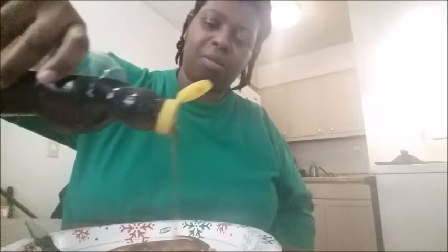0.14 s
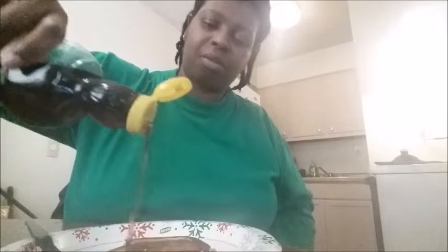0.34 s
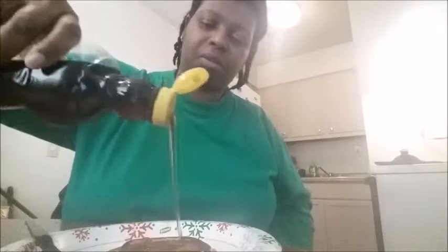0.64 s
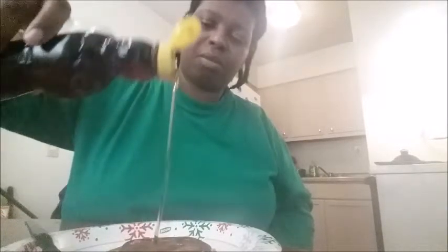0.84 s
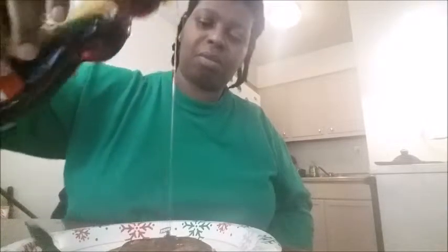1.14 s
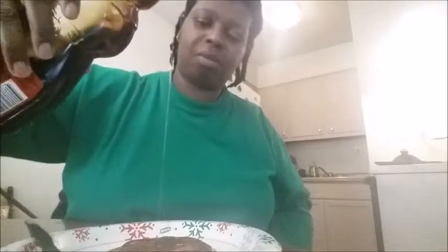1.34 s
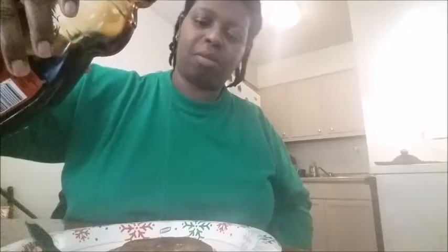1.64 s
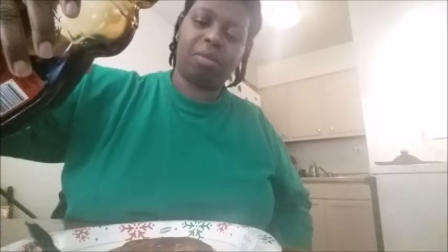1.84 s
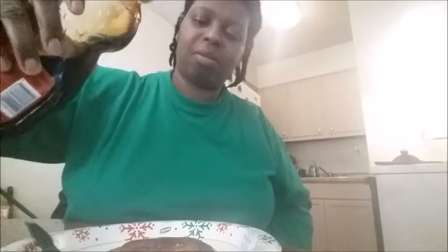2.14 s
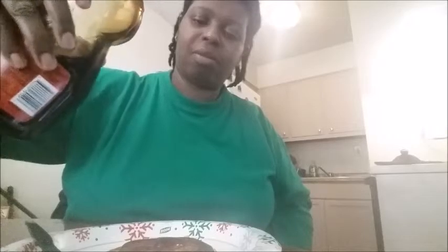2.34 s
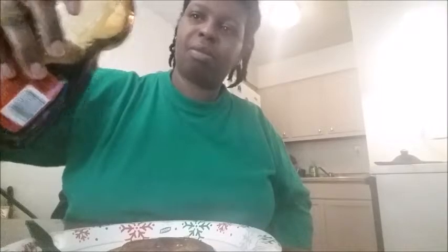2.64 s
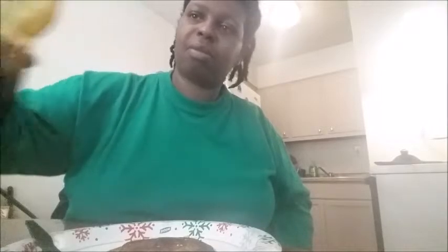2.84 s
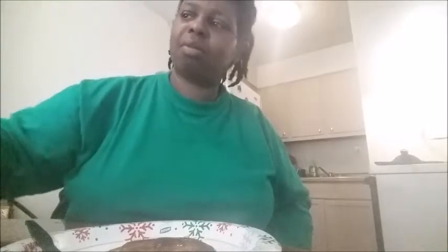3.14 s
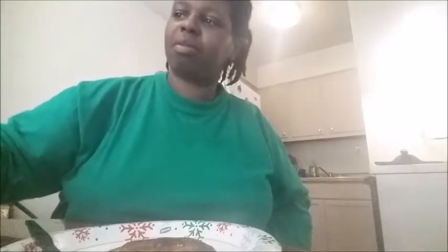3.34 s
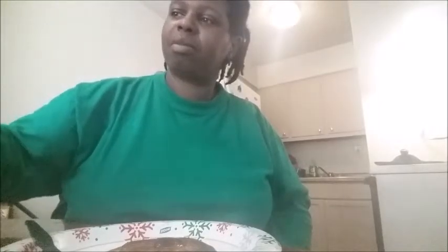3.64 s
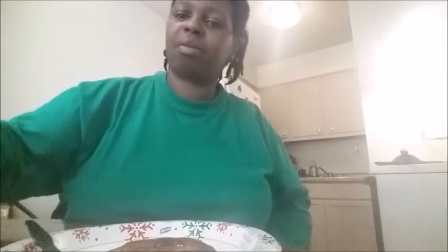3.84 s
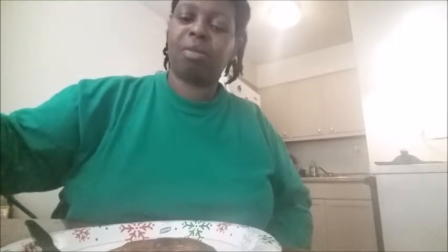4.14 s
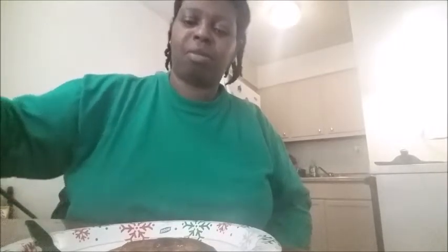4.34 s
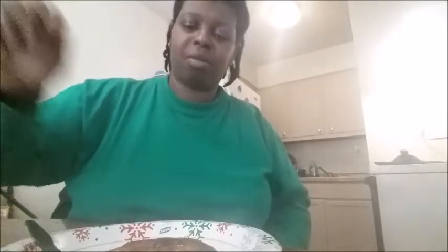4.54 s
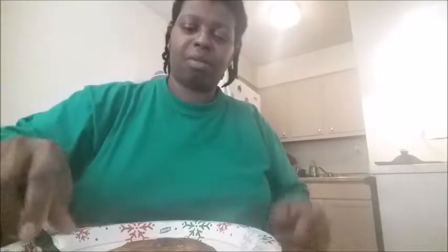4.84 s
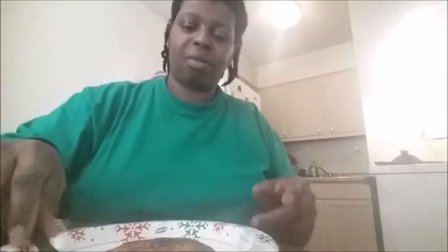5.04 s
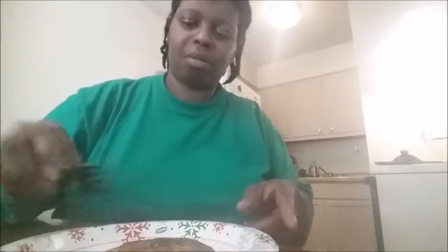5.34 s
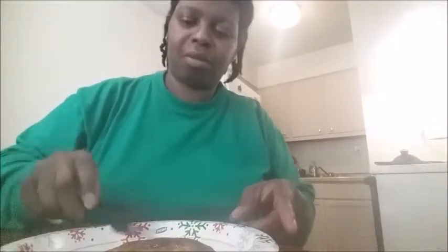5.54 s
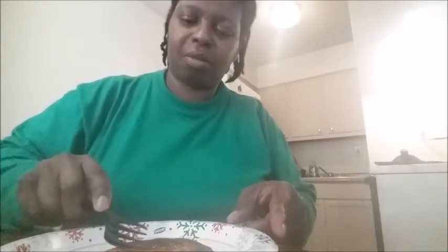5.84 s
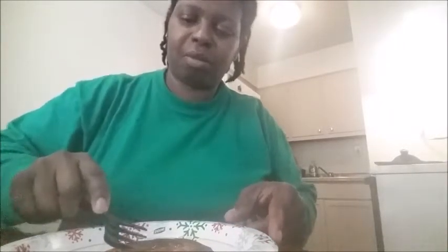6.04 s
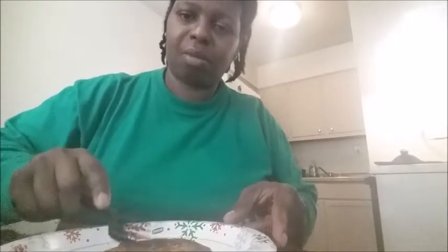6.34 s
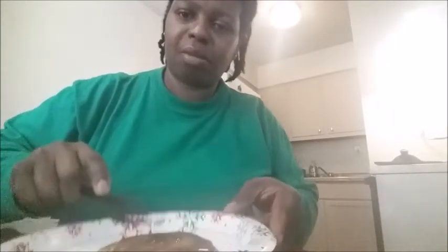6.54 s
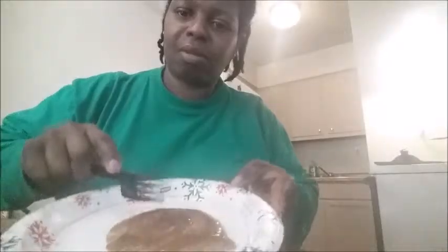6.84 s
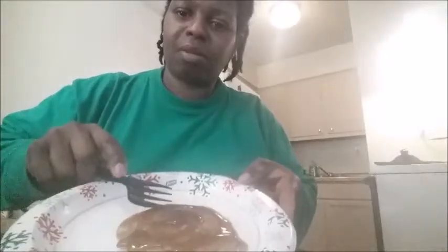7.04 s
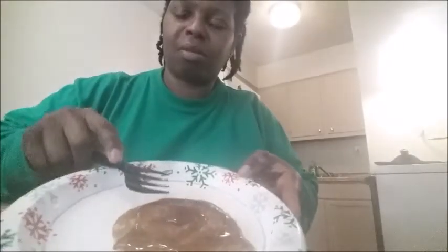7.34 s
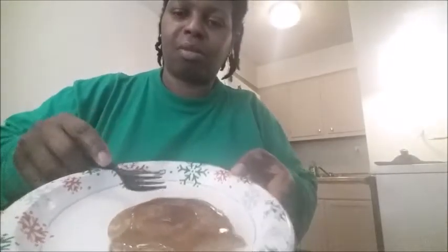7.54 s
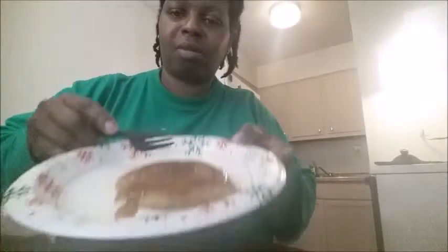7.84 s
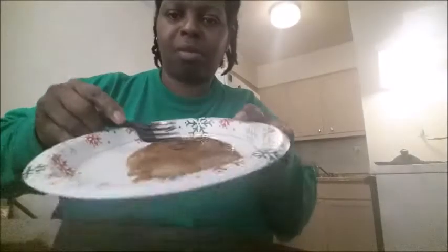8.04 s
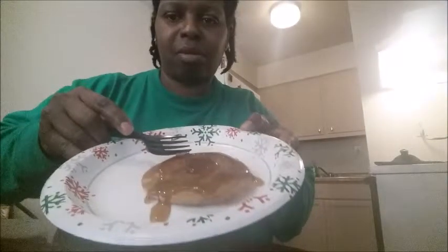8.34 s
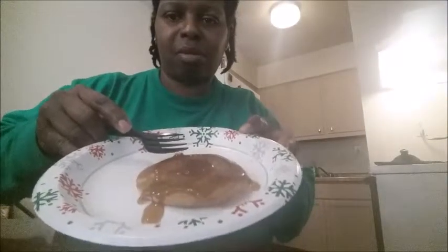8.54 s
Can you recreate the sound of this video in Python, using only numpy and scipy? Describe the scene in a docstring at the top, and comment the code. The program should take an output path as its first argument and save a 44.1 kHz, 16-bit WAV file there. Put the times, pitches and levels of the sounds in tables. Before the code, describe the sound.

A quiet small kitchen with a low, steady refrigerator hum. Faint plastic handling at first, then firmer rubs and clicks as a bottle is moved and set down with dull table thuds. A fork is picked up with one bright, hard knock, then a paper plate pops in a quick flutter and is rubbed and lifted with dry ticks. Close stereo phone microphone on the table, slight room echo.

```python
"""Bottle, fork and paper plate in a quiet kitchen

A plastic bottle is handled and set down, a fork is picked up and knocks, a paper plate is flexed and rubbed.
Ticks and rubbing are shaped noise; fork, plate and table ring as sums of fading sine waves.
A refrigerator hums behind them in slightly unsteady sine tones, over the soft noise of the room.
All is heard through the two microphone ports, left and right, of a phone that stands on the table."""
import sys
import numpy as np
from scipy import signal
from scipy.fft import rfft, irfft, next_fast_len
from scipy.io import wavfile
from scipy.ndimage import uniform_filter1d, map_coordinates

SR = 44100
rng = np.random.default_rng(int(sys.argv[2]) if len(sys.argv) > 2 else 0)


def waveform_to_disk(signal):
    """Save audio, clipped to [-1, 1], as 16-bit WAV at the path in sys.argv[1]."""
    frames = np.transpose(np.atleast_2d(signal))
    scaled = np.clip(frames, -1, 1) * 32767
    samples = np.round(scaled).astype(np.int16)
    wavfile.write(sys.argv[1], SR, samples)


N = 383229  # length in samples

# strokes of hands on plastic and paper: full_level_s (when the rise ends), rise_s, hold_s, fall_s, level_db,
# body_db and fizz_db (lows and highs against the middle), grip_hz and grip_db (ring of the gripped part)
HAND_STROKES = [ (0.27, 0.022, 0.022, 0.12, -71, 11, -12, 1240, 18.5),
                (0.362, 0.045, 0.038, 0.14, -68.5, 8.5, -10, 1240, 16),
                (0.884, .04, .01, .2, -89.5, 18, 10.5, 1200, 5),
                (1.093, .1, 0.14, 0.37, -95.5, 8, 11, 997, -2),
                (1.449, .02, .02, 0.14, -78, 23, -16, 780, 1),
                (2.228, .1, 0.079, 0.34, -76.5, 9, -8.5, 1700, 6.5),
                (2.43, 0.011, .015, .16, -59, 3, 1.5, 2000, 7),
                (2.529, 0.02, .012, 0.2, -51.5, -2, -4, 1310, 8),
                (2.639, .15, 0.083, 0.11, -59, 3, -8, 1650, 6),
                (2.79, .05, 0.061, 0.93, -70, 5, -8.5, 1590, 1.5),
                (2.996, 0.058, 0.045, .15, -63.5, 10, -1.5, 1274, 12),
                (3.129, .02, 0.023, 0.18, -63, 9.5, -5.5, 1840, 8),
                (3.4, 0.0093, .03, 0.13, -65.5, 19, -6, 1800, 0.5),
                (3.467, 0.12, .12, 0.1, -60.5, 9.5, -7.5, 1790, 1.5),
                (3.613, .03, 0.08, .9, -72, 11.5, -8.5, 2000, -1),
                (4.048, 0.011, 0.009, 0.12, -68, 12, 1, 4930, 11),
                (4.12, 0.049, .01, 0.042, -67, 14, -13, 4970, 8),
                (4.203, 0.14, 0.14, .4, -71.5, 11, -5, 4020, 7.5),
                (4.48, 0.073, .015, 0.24, -69, 13, -8.5, 2000, 3.5),
                (4.65, 0.12, .1, 0.46, -80.5, 13, -2, 2200, 2),
                (5.008, 0.012, .03, .1, -75, 13, -10, 2490, 2.5),
                (5.085, .1, 0.025, .12, -63.5, 7, -3, 2600, 4.5),
                (5.18, 0.026, .004, 0.022, -60, 13, -10, 2740, 1),
                (5.218, 0.022, .003, .009, -57.5, -2, 11, 2750, 6),
                (5.259, .03, 0.013, 0.049, -49.5, -2, 5, 2700, 2),
                (5.334, .03, .03, .15, -65.5, -5, -4, 2660, 0.5),
                (5.45, .1, .03, .4, -78, 9, 4.5, 2400, 0.5),
                (5.767, 0.022, .005, .06, -74, 3, -4, 2110, 4.5),
                (5.833, 0.13, 0.036, 0.26, -83, 20, 6, 2150, 1.5),
                (6.089, .03, .005, .1, -72, -6, 1.5, 2200, 12),
                (6.14, .05, .05, 0.58, -85, 5, 7.5, 2250, 5.5),
                (6.435, 0.095, 0.035, 0.27, -71, 18, 2.5, 2380, 0.5),
                (6.704, 0.1, 0.053, .1, -65, 5, -2, 2490, 5.5),
                (6.802, 0.093, .035, 0.14, -64, 11, -1, 2520, 6),
                (6.893, 0.06, 0.067, 0.37, -68.5, 9, -7, 2580, 2.5),
                (7.015, 0.02, .04, .1, -61, 3, 3.5, 2560, 3), (7.094, .1, 0.01, .045, -54, 4, -6, 2610, 4),
                (7.178, .05, .03, .2, -70, 13, -1.5, 2600, 2.5),
                (7.279, .1, 0.084, 0.09, -57, 6.5, -6, 2710, 3.5),
                (7.424, .01, .05, 0.11, -68, 11.5, 1, 2710, 4),
                (7.535, 0.044, 0.055, 0.25, -72.5, 13.5, -4.5, 2710, 6),
                (7.674, .06, .025, .05, -57, 0, -6, 2720, 7.5),
                (7.762, .14, .03, 0.05, -55.5, 3, -1, 5770, 7.5),
                (7.854, .05, .02, 0.12, -72, 9.5, 6, 2470, 4),
                (7.982, 0.064, .01, .15, -70.5, 12, -1.5, 2550, 2),
                (8.047, .1, .1, .9, -76.5, 12, -6, 2550, -3)]
SWELL_DB = 20  # change of level within one rise or fall time


def ticks():
    """A sharp snap, a short ring and a few milliseconds of rattle; the treble dies first."""
    # dry ticks: start_s, level_db, body_db and fizz_db (lows and highs against the middle),
    # left_right_db, ring_hz, ring_db (against the middle)
    dry_ticks = [(.2673, -63.5, 15, -16, -5, 1160, 10), (.3581, -68, 8, 3, -7, 1310, 7),
                 (1.4458, -78, 23, -10, -5, 753, 33), (2.433, -56.5, 16, 15.5, -8, 920, 6),
                 (2.5194, -52, 5, -6, -4, 1300, 4), (2.527, -48.5, 9, 9, -8.5, 780, 13),
                 (2.6218, -52, 9, -10.5, -3, 770, 3), (2.9868, -58, 7, -6, -7, 1230, 0),
                 (3.1332, -53, 7, -4.5, -8, 760, 6), (3.3983, -51.5, 8, -2.5, -2, 700, 6),
                 (3.456, -54.5, 5, -4, -9, 1260, -3), (3.5245, -60, 10, -4, -6, 785, 6),
                 (3.5748, -59.5, 17, -10, -10, 700, 6), (4.0259, -43, 8.5, 0.5, -13, 2580, -6),
                 (4.0339, -57, 4, 3, -4, 4840, 6), (4.4769, -65.5, 16.5, 4, -4, 700, 9),
                 (5.0095, -54, 4, -8, -11, 2400, 0), (5.0502, -57, 5, -1, -13, 770, 0),
                 (5.1888, -57, -10, 2, -6, 2700, -6), (5.2408, -36, 3, -2.5, -15, 2620, -4),
                 (5.4782, -71, 6, 12.5, -6, 720, 0), (5.7662, -68.5, 4, 2, -7, 2140, 4),
                 (6.0923, -62, -2, 3, -12, 2360, 9), (6.2277, -74, 6, 8, -3, 960, 2),
                 (6.6997, -57.5, 8, -13, -4, 2400, -8), (6.7502, -52.5, -18, -2, -16, 2300, 8.5),
                 (7.0118, -52.5, -2, 0, -17, 2500, -6), (7.1114, -52.5, 0, -10, -5, 840, 12),
                 (7.2873, -46, -1, -9, 3, 2530, -3), (7.4152, -36, 0, -4, -8, 1370, 1.5),
                 (7.6557, -53.5, 1, -8, -2, 2470, -2), (7.7641, -44.5, -.5, -4, -6, 2200, -3),
                 (7.9766, -66, 0, 2, -10, 2500, 2)]
    snap_t60_s, ring_t60_s = 0.012, 0.024  # time to fall by 60 dB, for the middle and for the ring
    out = np.zeros((2, N + SR))
    t = np.arange(2048) / SR
    shared, left, right = rng.standard_normal((3, N))
    noise = shared + 1.4 * np.array([left, right])
    # a small contact radiates little bass
    parts = registers(filtered(noise, lambda hz: hz ** 2 / (hz ** 2 + 1000. ** 2)))
    onset = 1 - np.exp(-t / .0001)
    for k, (start_s, level_db, body_db, fizz_db, pan_db, ring_hz, ring_db) in enumerate(dry_ticks):
        # each tick takes its own piece of the noise
        body, middle, fizz = (part[:, k * len(t):][:, :len(t)] for part in parts)
        fall_db = -60 * t / snap_t60_s
        snap = middle * amp(fall_db)
        snap = snap + amp(body_db + 0.72 * fall_db) * body
        snap = snap + amp(fizz_db + 1.04 * fall_db) * fizz
        ring = amp(ring_db - 60 * t / ring_t60_s) * np.sin(2 * np.pi * ring_hz * t)
        tick = amp(level_db) * sides(pan_db)[:, None] * (snap + ring) * onset
        out[:, round(start_s * SR):][:, :len(t)] += tick
    return out[:, :N]


def fork():
    """Short hard knocks of the handle against the table make the fork ring."""
    # knocks: start_s, strength_db, left_right_db
    knocks = [(5.1875, -48, -2), (5.2407, -29, -4), (5.2464, -43, -2)]
    # ringing tones of the fork: pitch_hz, level_db, t60_s (time to fall by 60 dB)
    fork_modes = [(755, -10.5, 0.2), (837, -1, 0.059), (1066, 1, 0.024), (1146, 0, 0.086),
                  (1224, -4.5, 0.068), (1350, -0.5, 0.021), (1700, -2, 0.014), (1897, -4, 0.031),
                  (2000, -7.5, 0.025), (2200, -0.5, 0.038), (2520, -10, 0.041), (2574, -3, 0.062),
                  (2710, -5.5, 0.1), (2720, -20.5, 0.054)]
    # the high ring reaches the right port best: pitch_hz, left_right_db
    fork_lean = [(700, 0), (1500, -3), (2500, -4.5)]
    ringing = -struck(fork_modes, knocks, attack=.0001, spread_db=1.0)
    return filtered(ringing, lambda hz: sides(along(fork_lean, hz)))


def plate():
    """The paper buckles in quick runs of pops, each a bundle of briefly ringing tones."""
    # pops: start_s, strength_db
    pops = [(6.398, -40), (6.41, -34.5), (6.416, -39.5), (6.4201, -33), (6.4254, -35.5), (6.4346, -35.5),
            (6.4394, -37.5), (7.4156, -44), (7.766, -47.5), (7.7732, -41), (7.784, -47)]
    # ringing tones of the plate: pitch_hz, level_db, t60_s (time to fall by 60 dB)
    plate_modes = [(150, 0.5, 0.079), (202, 3, 0.072), (231.4, 5, 0.045), (392, 0.5, 0.068),
                   (460, 2, 0.043), (510, -14, 0.061), (780, -25, 0.021), (1050, -39, 0.026)]
    blows = [(start_s, strength_db, -1.5) for start_s, strength_db in pops]
    return -struck(plate_modes, blows, attack=.001, spread_db=2)


def table():
    """A softer blow is a longer push that wakes the upper tones less; the lowest tone sways the whole table."""
    # blows on the table top: start_s, strength_db, hardness_hz, sway_db (of the whole table), left_right_db
    thuds = [(3.399, -22, 290, 0, -6), (3.428, -26.5, 150, -3.5, -8.5), (3.575, -27.5, 300, -4.5, -5),
             (3.588, -21.5, 199, 3, -7), (3.6, -29, 200, 2.5, -2), (3.807, -41, 150, 6.5, -11),
             (3.856, -33.5, 202, -6, -6.5), (4.038, -38, 403, -10, -6), (4.117, -31, 250, -17, -5),
             (4.131, -41, 201, -12, -16), (4.475, -37, 300, -16, -7)]
    # ringing tones of the table: pitch_hz, level_db, t60_s (time to fall by 60 dB)
    table_modes = [(60.3, -1.5, 0.3), (97.3, -2.5, 0.19), (122.3, 0, 0.16), (154.7, -2.5, 0.13),
                   (246, -1.5, 0.072), (318.7, -11.5, 0.18), (411, -4, 0.08), (497, -12, 0.064),
                   (700, -27, 0.051)]
    out = 0
    for start_s, strength_db, hard_hz, sway_db, pan_db in thuds:
        felt = []
        for k, (hz, level_db, t60_s) in enumerate(table_modes):
            softness_db = 10 * np.log10(1 + (hz / hard_hz) ** 4)
            felt.append((hz, level_db - softness_db + sway_db * (k == 0), t60_s))
        out = out + struck(felt, [(start_s, strength_db, pan_db)], attack=0.00062, spread_db=2.5)
    return out


def rubbing():
    """Skin and plastic slip in dense tiny jerks; the loudest stroke sets the resonance of the gripped part."""
    # balance of the rubbing: pitch_hz, left_right_db
    rub_lean = [(60, -2), (180, -2), (540, -3.5), (1640, -2), (4930, -12.5), (14800, 6)]
    body_db, fizz_db, grip_hz, grip_db = np.transpose(HAND_STROKES)[5:]
    hz, t = signal.stft(np.zeros(N), SR, nperseg=256)[:2]
    loudest = strokes(t).argmax(0)
    distance = np.log((hz[:, None] + 1) / grip_hz[loudest])
    ring_db = grip_db[loudest] * np.exp(-(distance / 0.15) ** 2)
    shared, left, right = patched(count=3, size=256, depth_db=2.5, bins=3, frames=9, boost_db=ring_db)
    jerks = amp(1.34 * wobble(400) + 1.32 * wobble(40))
    # the two ports hear different parts of the surface
    pair = (shared + 2.3 * np.array([left, right])) * jerks
    parts = registers(filtered(pair, lambda hz: sides(along(rub_lean, hz))))
    steps = np.arange(0, N / SR, .001)
    power = strokes(steps)
    out = 0
    for part, part_db in zip(parts, (body_db, 0 * body_db, fizz_db)):
        gain = np.sqrt(amp(2 * part_db) @ power)
        out = out + np.interp(np.arange(N) / SR, steps, gain) * part
    return out


def strokes(t):
    """Power of each stroke at times t: it rises, holds and falls."""
    full_s, rise_s, hold_s, fall_s, level_db = np.transpose(HAND_STROKES)[:5, :, None]
    before = np.maximum((full_s - t) / rise_s, 0)
    after = np.maximum((t - full_s - hold_s) / fall_s, 0)
    return amp(2 * np.maximum(level_db - SWELL_DB * (before + after), -200))


def kitchen(x):
    """The room answers with fading noise; each frequency dies at its own speed."""
    # fading of the room: pitch_hz, t60_s (time to fall by 60 dB)
    room_fade = [(300, 0.23), (2000, 0.23), (10000, 0.19)]
    hz, t, z = signal.stft(rng.standard_normal((2, SR // 2)), SR, nperseg=256)
    fade = amp(-60 * t / along(room_fade, hz)[:, None])
    tail = signal.istft(z * fade, SR, nperseg=256)[1]
    delayed = np.pad(x, ((0, 0), (200, 0)))  # samples
    return signal.fftconvolve(delayed, tail / np.linalg.norm(tail[0]), axes=1)[:, :N]


def fridge():
    """Slightly unsteady motor tones over the patchy noise of the room."""
    # refrigerator tones: pitch_hz, level_db, left_right_db, left_lead_rad (how far the left port is ahead)
    hum_tones = [(68.3, -62, -2.5, -0.021), (119.55, -54, 0, -0.65), (200.2, -47.5, -7, 0.21),
                 (293.6, -59.5, 1, -0.51), (354.4, -64, 0.5, 0.075), (399.6, -65.5, -4, -0.32),
                 (414.9, -63, -8.5, 0.0068), (2810, -95.5, -3, 0), (3070, -100, -3.5, 0),
                 (3220, -99, -3.5, 0)]
    # colour of room air and microphone hiss: pitch_hz, level_db (per Hz)
    air_colour = [(15, -25), (40, -3), (58, -19.5), (70, -7), (105, -10), (160, -8.5), (240, -11.5),
                  (450, -19.5), (1190, -30.5), (1930, -44), (4000, -54), (7000, -57.5), (10000, -69.5),
                  (14600, -49.5)]
    # how alike the air is at left and right: pitch_hz, likeness (1 = the same, 0 = unrelated)
    air_alike = [(60, 0.92), (180, 1), (540, 0.32), (1640, 0), (4930, 0.0), (14800, -0.0)]
    # balance of the air: pitch_hz, left_right_db
    air_lean = [(60, -3), (150, -5), (380, -4.5), (940, -4.0), (2370, -0.5), (5930, -7), (14800, 2.5)]
    air_db = -49  # level of the air as it reaches the microphone
    t = np.arange(N) / SR
    tones = 0
    for hz, level_db, pan_db, lead_rad in hum_tones:
        phase = 2 * np.pi * (hz * t + rng.random()) + 0.18 * wobble(2.8)
        tone = np.sin(phase + np.array([[lead_rad / 2], [-lead_rad / 2]]))
        swell = np.sqrt(2) * amp(level_db + 0.65 * wobble(2.037))
        tones = tones + swell * sides(pan_db)[:, None] * tone
    pair = patched(count=2, size=512, depth_db=1.5, bins=6, frames=14)
    # mixing a common and an opposite noise by this angle sets the likeness
    turn = lambda hz: np.arccos(np.clip(along(air_alike, hz), -1, 1)) / 2
    mid, side = filtered(pair, lambda hz: amp(along(air_colour, hz)) * [np.cos(turn(hz)), np.sin(turn(hz))])
    air = filtered(np.array([mid + side, mid - side]), lambda hz: sides(along(air_lean, hz)))
    return tones + amp(air_db) * unit(air)


def struck(modes, blows, attack, spread_db):
    """Every blow (start_s, strength_db, left_right_db) rings the modes, fading sines, at new strengths."""
    out = np.zeros((2, N + SR))
    t = np.arange(SR // 2) / SR
    for start_s, strength_db, pan_db in blows:
        ring = 0
        for hz, level_db, t60_s in modes:
            fall = amp(level_db + rng.normal(0, spread_db) - 60 * t / t60_s)
            ring = ring + fall * np.sin(2 * np.pi * hz * t)
        blow = sides(pan_db)[:, None] * amp(strength_db) * ring * (1 - np.exp(-t / attack))
        out[:, round(start_s * SR):][:, :len(t)] -= blow
    return out[:, :N]


def registers(x):
    """x in the colour of the surfaces, split into body, middle and fizz, each of rms 1."""
    # colour of the surfaces: pitch_hz, level_db (per Hz)
    surface = [(260, -34), (450, 1), (650, -7), (750, -3), (970, -9), (1700, -12), (2500, -9.5),
               (4000, -19), (8000, -20.5), (14600, -36)]
    below = lambda hz, edge: 1 / (1 + (hz / edge) ** 8)
    body = lambda hz: below(hz, 1500)
    middle = lambda hz: below(hz, 4000) - below(hz, 1500)
    fizz = lambda hz: 1 - below(hz, 4000)
    colour = lambda hz: amp(along(surface, hz))
    return [unit(filtered(x, lambda hz: colour(hz) * share(hz))) for share in (body, middle, fizz)]


def patched(count, size, depth_db, bins, frames, boost_db=0):
    """Noise rows whose gain varies in patches of frequency and time."""
    z = signal.stft(rng.standard_normal((count, N)), nperseg=size)[2]
    field = uniform_filter1d(rng.standard_normal(z.shape[1:]), bins, 0)
    field = uniform_filter1d(field, frames, 1)
    return signal.istft(z * amp(depth_db * unit(field) + boost_db), nperseg=size)[1][:, :N]


def late(x, count):
    """The left port lies further from the hands and hears them count samples later."""
    return np.array([np.pad(x[0], (count, 0))[:N], x[1]])


def sides(pan_db):
    """Left and right gains around the middle; a positive pan_db favours the left."""
    g = amp(np.asarray(pan_db) / 2)
    return np.array([g, 1 / g]) * 2 / (g + 1 / g)


def filtered(x, response):
    """x with each frequency scaled by response(hz)."""
    m = next_fast_len(N + SR // 2)
    return irfft(rfft(x, m) * response(np.fft.rfftfreq(m, 1 / SR)), m)[..., :N]


def wobble(rate):
    """A smooth random curve with rate random points a second."""
    return map_coordinates(rng.standard_normal(int(N * rate / SR) + 4), [np.arange(N) * rate / SR])


def along(points, hz):
    """Value at hz between (pitch_hz, value) points on a log axis."""
    f, v = np.transpose(points)
    return np.interp(np.log(hz + 1), np.log(f + 1), v)


def unit(x):
    """x scaled to rms 1."""
    return x / np.sqrt(np.mean(x ** 2) + 1e-20)


def amp(db):
    """Decibels to gain."""
    return 10 ** (np.asarray(db) / 20)


def scene():
    """Hits and their echo in the room, blows through the table, rubbing and hum."""
    hits = ticks() + fork() + plate()
    echo = amp(-8.5) * kitchen(hits)
    return late(hits, count=2) + echo + late(table(), count=12) + rubbing() + fridge()


def record(dry):
    """The phone's microphone rolls off the deep bass, colours the treble and keeps nothing above its band limit."""
    # resonances of the microphone ports: pitch_hz, level_db
    ports = [(2000, 0), (2550, -1.5), (3400, -1.5), (4900, -0.5), (5900, -4.5), (6850, 3.5), (7600, -2),
             (8300, 0), (9800, -9), (12400, 3.5), (14600, -6)]
    bass_hz, top_hz = 61, 14680
    bass = lambda hz: -hz ** 2 / (bass_hz ** 2 - hz ** 2 + 1.4j * hz * bass_hz)
    return filtered(dry, lambda hz: bass(hz) * amp(along(ports, hz)) * (hz < top_hz))


dry = scene()
out = record(dry)
waveform_to_disk(out)
```